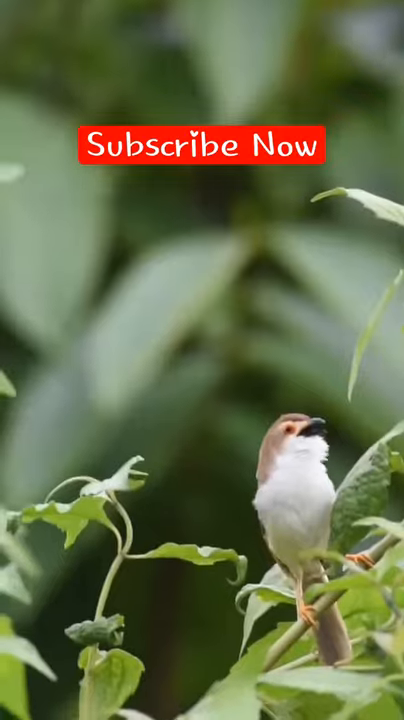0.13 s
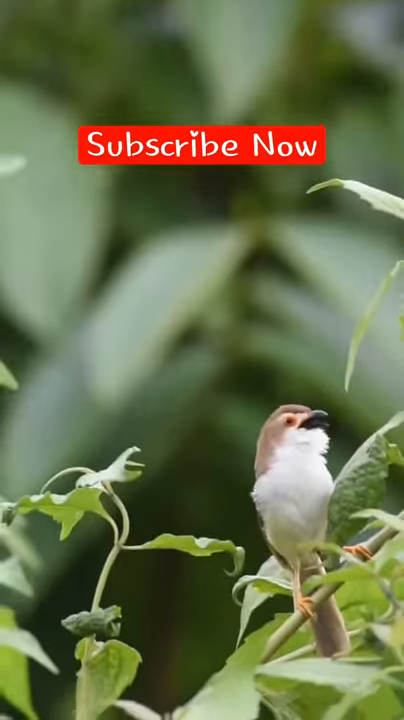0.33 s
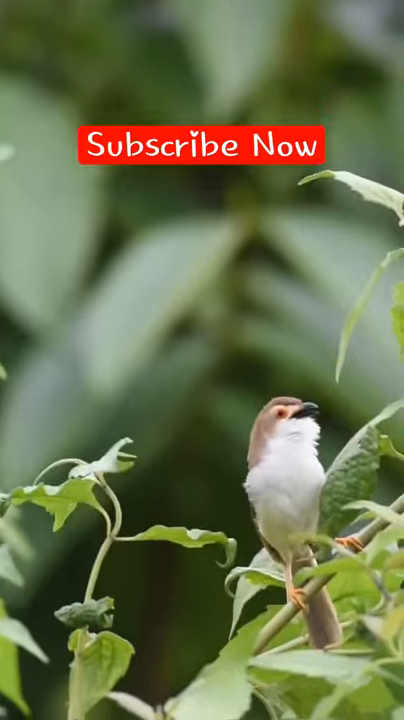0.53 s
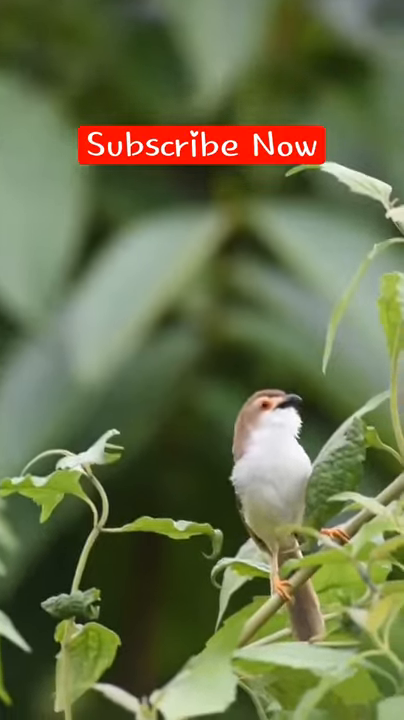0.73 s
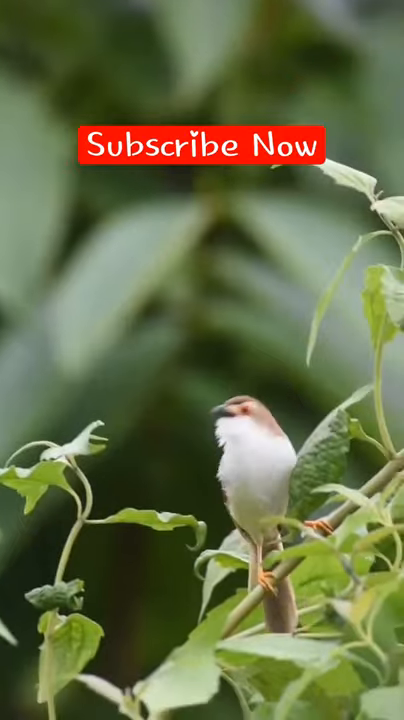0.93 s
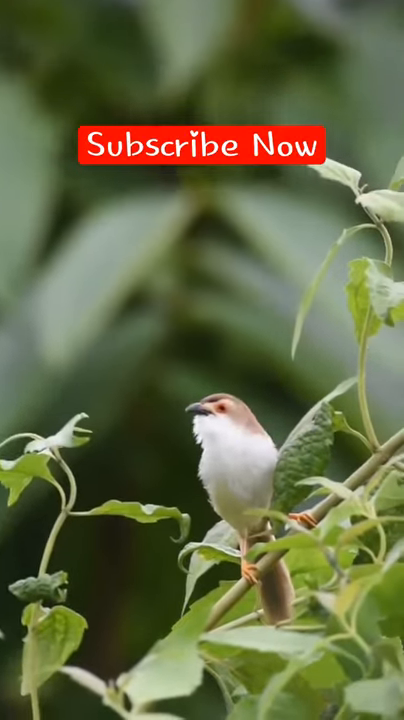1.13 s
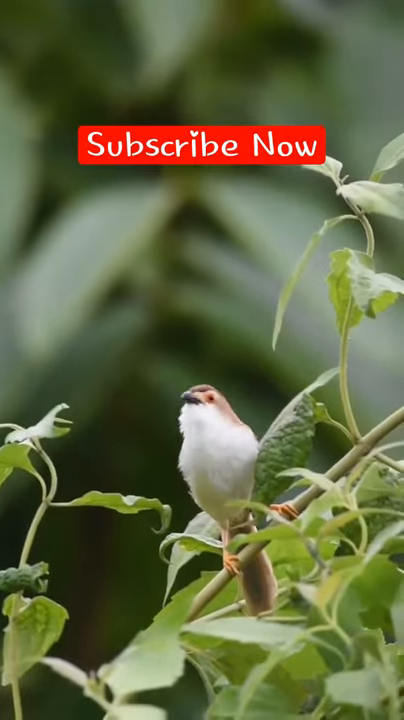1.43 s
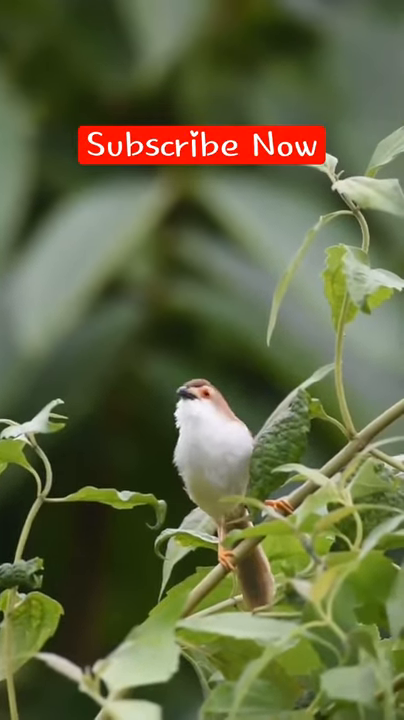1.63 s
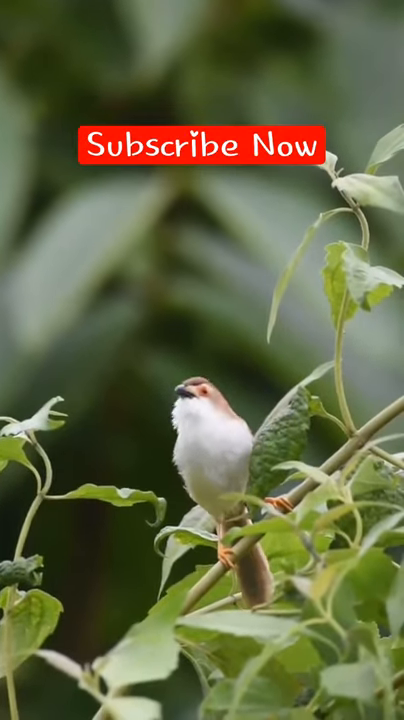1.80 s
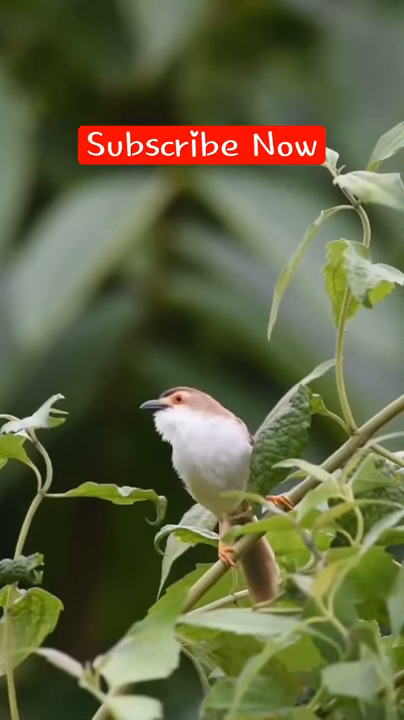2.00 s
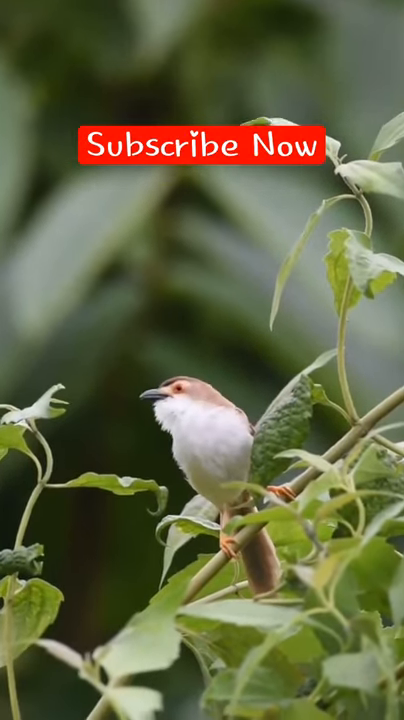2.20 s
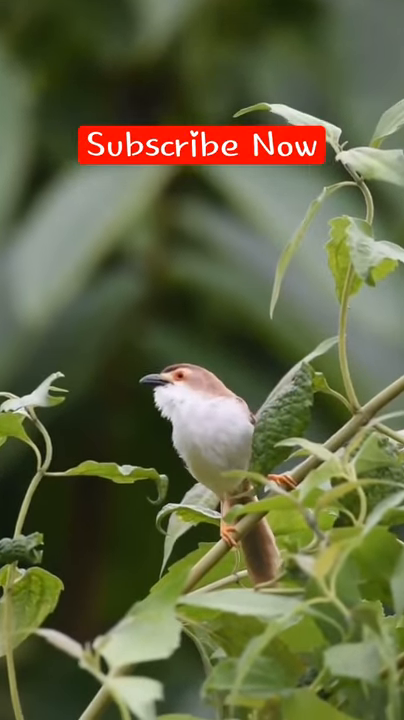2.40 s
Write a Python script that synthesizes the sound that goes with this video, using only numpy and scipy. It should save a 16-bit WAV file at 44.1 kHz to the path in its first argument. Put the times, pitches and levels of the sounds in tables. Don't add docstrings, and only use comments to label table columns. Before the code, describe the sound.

Bird song outdoors. After a tiny silence, sound starts abruptly at 0.1 s: even, high falling chirps, about fifteen per second, until 0.55. Over them come three louder pure whistles: rising at 0.17-0.37, dropping then climbing with a fast quaver at 0.44-0.63, arching at 0.69-0.88. Then quiet air, dull distant rumble, faint insects and purring; weaker single chirps at 1.56, 1.9 and 2.15 s, softly echoed.

```python
import sys
import numpy as np
from scipy import signal
from scipy.fft import rfft, irfft
from scipy.io import wavfile
from scipy.ndimage import uniform_filter1d

SR = 44100
rng = np.random.default_rng(int(sys.argv[2]) if len(sys.argv) > 2 else 0)


def volts_from_db(level):
    exponent = np.asarray(level, float) / 20
    return 10 ** exponent


def transcribe(signal):
    frames = np.atleast_2d(signal).T
    limited = np.clip(frames, -1, 1)
    pcm = np.round(limited * 32767).astype(np.int16)
    wavfile.write(sys.argv[1], SR, pcm)


N = 112454

# time in seconds, pitch in Hz.
RISING_PITCH = [(.172, 1601.5), (.183, 2175), (.242, 2086), (.262, 2183), (.282, 2379.5), (.293, 2741),
                (.33, 2961.5), (.351, 2963), (.368, 2582)]
QUAVERING_PITCH = [(.446, 4244), (.452, 3903), (.458, 3458), (.468, 2950), (.49, 2639), (.51, 2702),
                   (.56, 3351), (.61, 3610), (.632, 3640)]
ARCHING_PITCH = [(.69, 2196), (.706, 2853), (.718, 3234), (.731, 3353), (.75, 3382), (.79, 3097),
                 (.83, 2630), (.856, 2400), (.876, 2010)]
# time in seconds, level in dB.
RISING_LEVEL = [(0.169, -52.5), (0.18, -22.5), (.22, -16.5), (.242, -16), (0.263, -18.5), (.32, -21.5),
                (.343, -23), (0.358, -18.5), (0.369, -35)]
QUAVERING_LEVEL = [(0.443, -32), (0.453, -20.5), (.47, -19), (.53, -20), (.55, -20), (0.584, -17.5),
                   (.609, -19.5), (0.622, -22.5), (0.634, -40)]
ARCHING_LEVEL = [(0.69, -36.5), (0.699, -31), (0.709, -25.5), (0.733, -17.5), (.767, -19), (.8, -23),
                 (0.833, -23), (.855, -31.5), (.878, -48.5)]
# second in dB, third in dB.
OVERTONES_DB = [(-45, -49), (-50, -51), (-44, -53)]
FLUTTER_DB = (.4, .8, .7)
# time in seconds, pitch swing in Hz, level swing in dB.
QUAVER_SWING = [(.45, 90.3, -5), (.475, 227, 3), (.545, 220, -2.5), (.58, 72, 1), (.632, 60.5, -3)]
# time in seconds, pitch in Hz, level in dB.
LEAD_IN = [(.432, 4300, -50), (.436, 5100, -49), (.439, 5750, -48), (.4425, 5900, -48), (.445, 5300, -48),
           (.449, 4100, -42)]
# time in seconds, spread in seconds, level change in dB.
SHORT_DIPS = [(.271, .004, -8), (.289, .0015, -4), (.4565, .001, -8), (.461, .001, -5), (.503, .001, -6),
              (.513, .001, -6), (.473, .001, -9), (.489, .001, -7), (.586, .0018, -12), (.6005, .0018, -13),
              (.6145, .002, -8), (.54, .001, -8), (.772, .0015, -5), (.804, .0015, -5), (.712, .002, -12),
              (.793, .002, -9)]
# centre in Hz, width in Hz, level change in dB.
NOTCHES = [(2690, 30, -3), (3085, 35, -4), (3195, 15, -5)]
# frequency in Hz, gain in dB.
BEAK = [(4200, 0.5), (4900, 11.5), (5800, 4.5), (6600, 3.5), (7600, 1), (9000, 19), (10200, 4)]
# start in
# seconds, length in seconds, from Hz, to Hz, level in dB.
FLICKS = [(.573, .012, 3400, 2230, -42), (.589, .011, 3500, 2300, -36), (.597, .01, 2400, 1600, -47),
          (.627, 0.01, 1900, 3300, -46), (.633, 0.008, 2900, 3650, -29), (.636, 0.012, 3700, 3150, -31),
          (.643, 0.01, 3400, 2300, -36), (.69, .017, 4450, 5750, -55)]
# share of length, share of pitch, level in dB.
NEAR_SHAPE = [(0, 1.02, -11), (.19, 1.012, -9), (.26, .985, 0), (.52, .918, -2), (.62, .885, -9),
              (.7, .869, 0), (.85, .84, 1), (.9, .82, -6), (1, .74, -12)]
FAR_SHAPE = [(0, 1.01, -10), (.25, .975, 0), (.45, .925, -3), (.6, .885, 0), (.84, .855, 0), (1, .835, -14)]
# start in seconds, length in seconds, pitch in Hz, early level in dB, late level in dB.
NEAR_CHIRPS = [(.025, .04, 3763, -40, -21), (.093, 0.04, 3875, -24.5, -26),
               (.1635, 0.035, 3940, -24.5, -24.5), (.231, 0.037, 3917, -24.5, -26),
               (.299, 0.037, 3946, -25.5, -25), (.371, .038, 3883, -23.5, -27),
               (.441, 0.039, 3900, -25.5, -24.5), (.519, 0.034, 3970, -29, -34)]
FAR_CHIRPS = [
    (1.558, 0.038, 3236, -41, -33.5),
    (1.9, 0.041, 3298, -38, -36),
    (2.146, 0.0342, 3400, -38, -42),
]
# start in seconds, length in seconds, from Hz, to Hz, level in dB.
GLIDES = [(0.136, 0.036, 2010, 2200, -50), (1.0, 0.25, 2607, 2355, -65), (1.211, 0.018, 2930, 3660, -61),
          (1.222, 0.014, 3520, 3550, -58), (1.24, 0.019, 3530, 3480, -58), (1.266, 0.033, 3540, 3480, -64),
          (1.287, .014, 3260, 3480, -61), (1.297, .03, 3410, 3500, -52.5), (1.324, .027, 3490, 3500, -52),
          (2.33, 0.1, 768, 743, -60.5), (2.537, 0.033, 3950, 3950, -52)]
HIDDEN_CALLS = [(.825, 0.053, 4200, 3626, -52.5), (.97, 0.042, 6500, 6250, -63.5),
                (1.02, 0.053, 6200, 5170, -61.5), (1.362, 0.044, 2400, 2720, -60),
                (1.392, 0.028, 2700, 3030, -57), (1.392, 0.029, 3150, 3580, -61.5),
                (1.66, 0.052, 2150, 2785, -56), (1.683, 0.034, 2750, 3400, -55.5),
                (1.703, 0.0246, 2800, 2950, -51.5)]
# echo level in dB, build-up in seconds, 60 dB decay in seconds.
ECHOES = [
    (-21.5, 0.015, 0.3),
    (-7, 0.014, 0.42),
    (-13, 0.01, 0.3),
    (-7, .01, .15),
    (2.5, 0.005, 0.2),
]
# delay in seconds, level in dB.
TRUNKS = [(.024, -16), (.041, -17), (.079, -20)]
# centre in Hz, width in Hz, level in dB, throb in Hz, throb depth in dB.
INSECTS = [(6100, 210, -81, 30, 0), (6500, 100, -75, 14, 1.5), (7900, 72, -76, 11, 10),
           (10715, 400, -65.5, 40, 0), (9940, 690, -73.5, 60, 1)]
# start in seconds, end in seconds, level in dB.
BOUTS = [
    (.1, .3, -72),
    (1.34, 1.6, -71),
    (2.18, 2.493, -71.5),
]
# frequency in Hz, density in dB per Hz.
AIR = [(25, -10), (140, -3), (450, -12), (1250, -11.5), (1800, -23.5), (4200, -27.5), (8800, -32.5),
       (12200, -47.5)]
# peak in seconds, spread in seconds, centre in Hz, width in Hz, level in dB.
SWELLS = [(1.093, 0.32, 650, 173, -51), (1.568, 0.055, 574, 23, -55), (2.076, 0.14, 266, 77, -53.5),
          (2.274, 0.068, 3750, 740, -53.5), (1.41, 0.16, 5350, 530, -65), (0.74, 0.13, 2800, 110, -56),
          (1.1, 0.028, 5570, 410, -64), (0.97, 1.2, 968, 100, -59.5), (0.48, 0.33, 3600, 2500, -54.5),
          (0.49, 0.36, 1900, 350, -64), (1.3, .7, 5760, 190, -65.5)]


def clock():
    return np.arange(N) / SR


def curve(rows, col=1):
    rows = np.array(rows)
    return np.interp(clock(), rows[:, 0], rows[:, col])


def level(x, db):
    return x * volts_from_db(db) / np.sqrt(np.mean(x ** 2))


def bell(x, centre, width):
    return np.exp(-.5 * ((x - centre) / width) ** 2)


def band(hz, width_hz):
    f = np.arange(N // 2 + 1) * SR / N
    return level(irfft(rfft(rng.standard_normal(N)) * bell(f, hz, width_hz), N), 0)


def walk(rate):
    return band(0, rate)


def whistle(hz, db, span, second_db, third_db):
    t, phase = clock(), 2 * np.pi * np.cumsum(hz) / SR
    tone = np.sin(phase)
    for k, over_db in ((2, second_db), (3, third_db)):
        beak_db = np.interp(k * hz, *np.array(BEAK).T)
        patchy_db = 3 * walk(6)
        blur = .6 * walk(220)
        tone = tone + volts_from_db(over_db + beak_db + patchy_db) * np.sin(k * phase + blur)
    edge = np.clip(np.minimum(t - span[0], span[1] - t) / .003, 0, 1)
    return np.sqrt(2) * volts_from_db(db) * tone * edge ** 2


def singer():
    t, out = clock(), 0
    start_s, period_s, slowing = .462, .0111, .026
    turns = np.log(np.maximum(1 + slowing * (t - start_s) / period_s, .1)) / slowing
    quaver = np.cos(2 * np.pi * (turns + .035 * walk(35)))
    short_dips = sum(db * bell(t, s, spread) for s, spread, db in SHORT_DIPS)
    notes = [(RISING_PITCH, RISING_LEVEL), (QUAVERING_PITCH, QUAVERING_LEVEL), (ARCHING_PITCH, ARCHING_LEVEL)]
    for k, (pitch, db) in enumerate(notes):
        hz = uniform_filter1d(curve(pitch), size=220) * (1 + .002 * walk(40))
        env = uniform_filter1d(curve(db), size=90) + FLUTTER_DB[k] * walk(122) + short_dips
        if k == 1:
            hz = hz + curve(QUAVER_SWING) * quaver
            env = env + curve(QUAVER_SWING, col=2) * quaver
        dips = sum(dip_db * bell(hz, f, width) for f, width, dip_db in NOTCHES)
        env = env + uniform_filter1d(uniform_filter1d(dips, size=80), size=80)
        out = out + whistle(hz, env, (db[0][0], db[-1][0]), *OVERTONES_DB[k])
    arch_hz = uniform_filter1d(curve(LEAD_IN), size=60) * (1 + .01 * walk(200))
    arch_db = curve(LEAD_IN, col=2) + 0.88 * walk(150)
    return out + whistle(arch_hz, arch_db, (LEAD_IN[0][0], LEAD_IN[-1][0]), -46, -60)


def chirps(rows, shape):
    shape, out = np.array(shape).T, 0
    for s, length, hz, early_db, late_db in rows:
        share = (clock() - s) / length
        pitch = uniform_filter1d(np.interp(share, shape[0], shape[1]), size=90)
        env = uniform_filter1d(np.interp(share, shape[0], shape[2]), size=90)
        db = np.interp(share, [.3, .7], [early_db, late_db])
        out = out + whistle(hz * pitch, db + env, (s, s + length), -41, -62)
    return out


def glides(rows, overtone_db, wobble=.012):
    out, flutter_db, waver = 0, 3.5 * walk(70), 1 + wobble * walk(140)
    for s, length, hz0, hz1, db in rows:
        share = np.clip((clock() - s) / length, 0, 1)
        steep = np.clip(abs(hz1 - hz0) / 300, .25, 1)
        hz = (hz0 + (hz1 - hz0) * share) * waver ** steep
        swell = np.sqrt(np.sin(np.pi * share) + 1e-9)
        out = out + swell * whistle(hz, db + flutter_db, (s, s + length), overtone_db, -87)
    return out


def foliage(x, db, build_s, t60):
    t = clock()[:SR]
    decay = volts_from_db(2 * walk(30)[:SR] - 60 * t / t60)
    tail = rng.standard_normal(SR) * decay * np.clip(t / build_s, 0, 1) ** 2
    return x + volts_from_db(db) * signal.fftconvolve(x, tail / np.sqrt(np.sum(tail ** 2)))[:N]


def trunk_echoes(x):
    return volts_from_db(3.3 * walk(97)) * sum(volts_from_db(db) * np.roll(x, int(s * SR)) for s, db in TRUNKS)


def frog():
    t, clicks = clock()[:4000], np.zeros(N)
    peak_s, purrs_hz, pulses_hz, duty = 1.555, 8.05, 64.4, 0.42
    k = np.arange(-99, 59)
    when = peak_s + k / pulses_hz
    turn = (k / pulses_hz * purrs_hz + .5) % 1 - .5
    purr = bell(turn, 0, duty / 2 + 0.0062)
    clicks[(when * SR).astype(int)] = purr * volts_from_db(-5 * (k % 2) + 0.4 * rng.standard_normal(len(k)))
    throat_hz, t60_s = 1321, 0.036
    ring = np.sin(2 * np.pi * throat_hz * t) * volts_from_db(-60 * t / t60_s) * (1 - np.exp(-t / 0.005))
    return level(signal.fftconvolve(clicks, ring)[:N], -61)


def insects():
    t, out = clock(), 0
    pause_s, hold_s, resume_s = 1.74, .16, .35
    pause_db = -6 * (t > pause_s) * np.clip(1 - (t - pause_s - hold_s) / resume_s, 0, 1)
    for hz, width, db, rate, throb_db in INSECTS:
        high = hz > 9000
        depth_db = min(abs(throb_db), 1.5 / (1 + high))
        out = out + volts_from_db(db + depth_db * walk(rate) + walk(1.5) + pause_db * high) * band(hz, width)
    gate = sum(volts_from_db(db) * ((t > a) & (t < b)) for a, b, db in BOUTS)
    return out + uniform_filter1d(gate, size=900) * band(7710, 200)


def air():
    t, out, shape, gust = clock(), 0, np.array(AIR).T, walk(0.17)
    for hz in 30 * 2 ** np.arange(0, 8.8, 1 / 3):
        db = np.interp(np.log(hz), np.log(shape[0]), shape[1]) + 10 * np.log10(hz)
        out = out + volts_from_db(db + 0.33 * gust + 2.07 * walk(3.6)) * band(hz, hz * 0.14)
    hum_hz, hum_db = 31.7, -64.5
    out = level(out, -50.5) + np.sqrt(2) * volts_from_db(hum_db + walk(3)) * np.sin(2 * np.pi * hum_hz * t)
    for s, spread, hz, width, db in SWELLS:
        swell = np.exp(-.5 * np.abs((t - s) / spread) ** 3)
        out = out + volts_from_db(db + walk(20)) * swell * band(hz, width)
    return out


def scene():
    far = chirps(FAR_CHIRPS, FAR_SHAPE)
    tilted = [(s, length, hz, early + 3, late - 6) for s, length, hz, early, late in FAR_CHIRPS]
    back = chirps(tilted, FAR_SHAPE)
    birds = [singer() + glides(FLICKS, -27),
             chirps(NEAR_CHIRPS, NEAR_SHAPE),
             back + trunk_echoes(back),
             glides(GLIDES, -74),
             glides(HIDDEN_CALLS, -55, wobble=.035)]
    echoed = sum(foliage(bird, *echo) for bird, echo in zip(birds, ECHOES))
    direct = far - back
    return (echoed + direct + frog() + insects() + air())[None]


def band_limit(x):
    return signal.sosfilt(signal.butter(12, 13930, fs=SR, output="sos"), x)


def record(dry):
    f = np.arange(N // 2 + 1) * SR / N
    dip_db = -15 * np.exp(-.5 * ((f - 8780) / 300) ** 4)
    top_db = -40 * np.clip((f - 11550) / 300, 0, 1)
    drive = 1.6
    heard = np.tanh(drive * irfft(rfft(dry) * volts_from_db(dip_db + top_db), N)) / drive
    loudness = uniform_filter1d(np.abs(heard), size=400)
    fizz = volts_from_db(-58 + 3.7 * walk(20)) * np.maximum(loudness - .012, 0) * band(13200, 700)
    start_s = .092
    return band_limit((heard + fizz) * np.clip((clock() - start_s) / 0.001, 0, 1))


dry = scene()
out = record(dry)
transcribe(out)
```